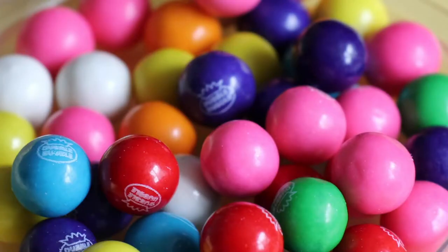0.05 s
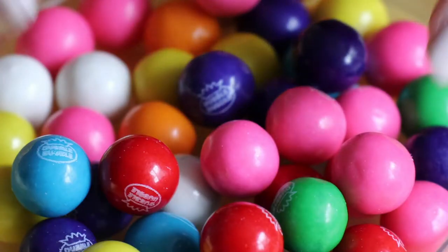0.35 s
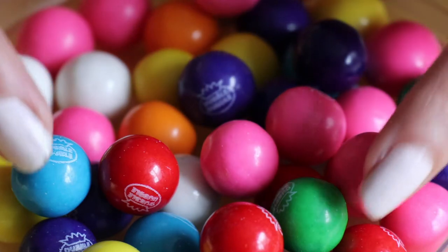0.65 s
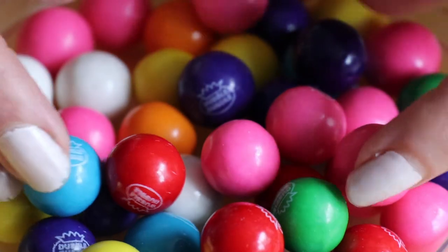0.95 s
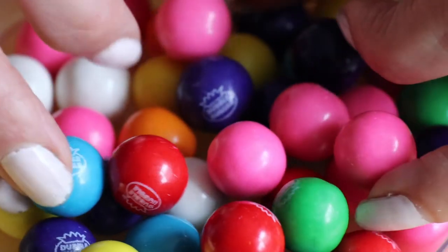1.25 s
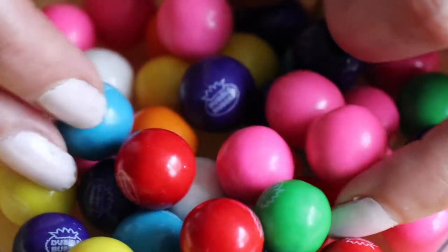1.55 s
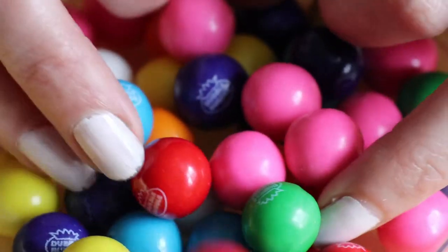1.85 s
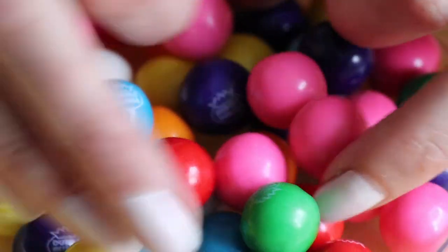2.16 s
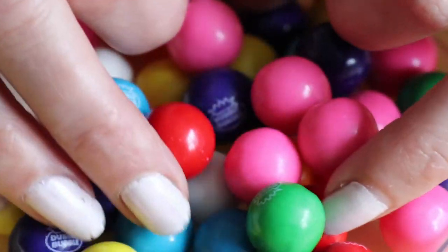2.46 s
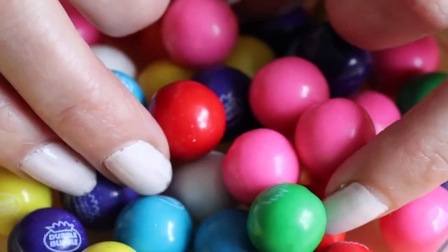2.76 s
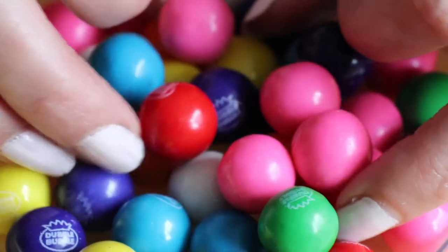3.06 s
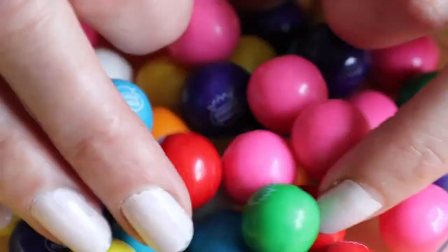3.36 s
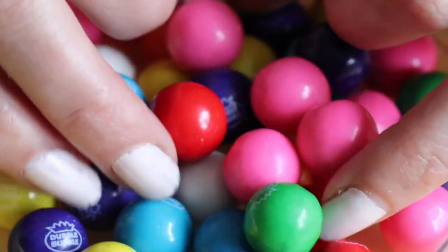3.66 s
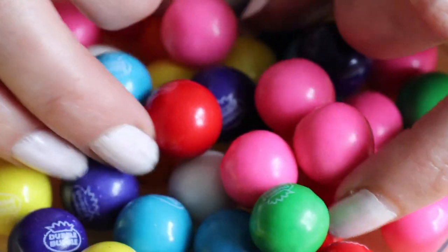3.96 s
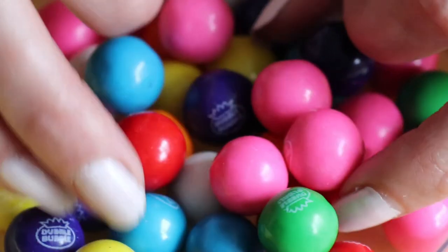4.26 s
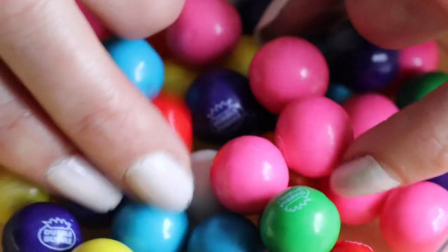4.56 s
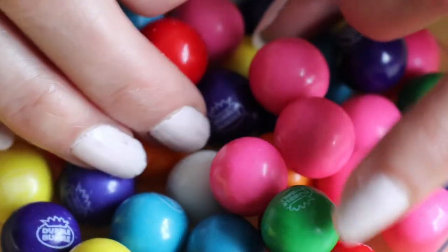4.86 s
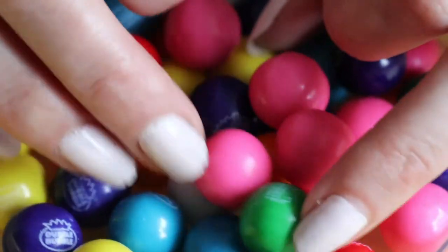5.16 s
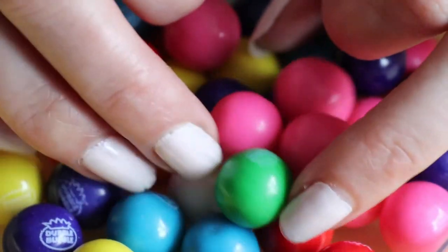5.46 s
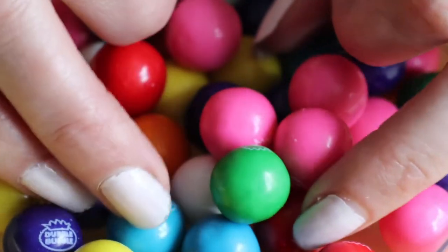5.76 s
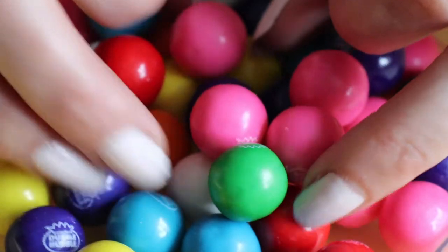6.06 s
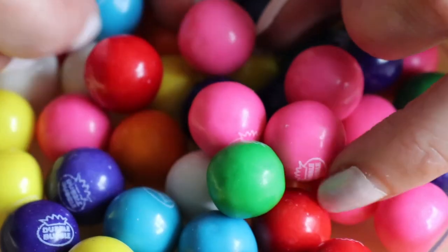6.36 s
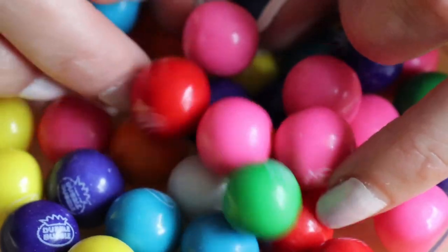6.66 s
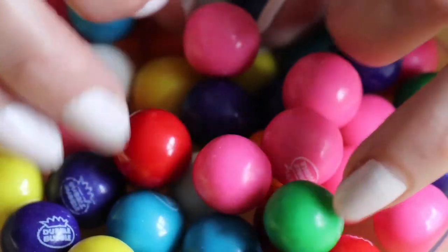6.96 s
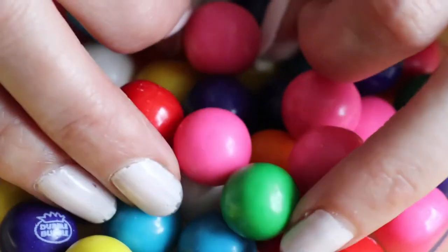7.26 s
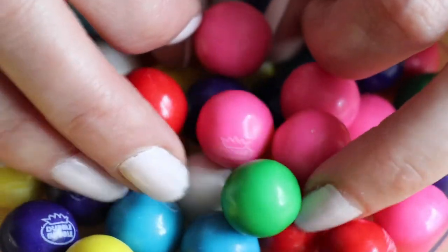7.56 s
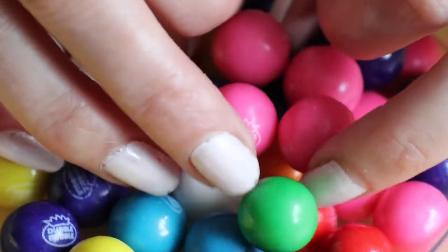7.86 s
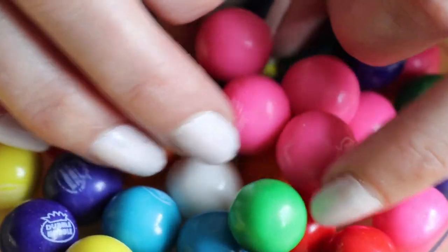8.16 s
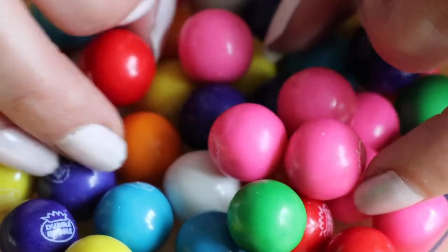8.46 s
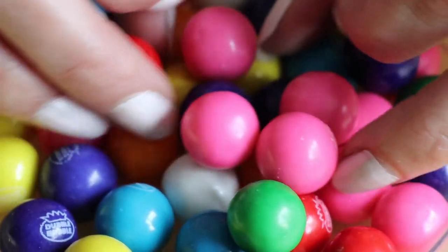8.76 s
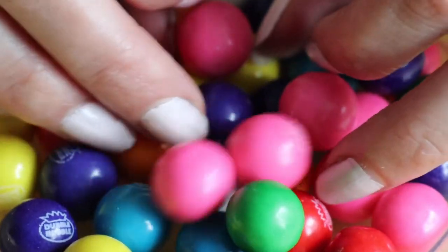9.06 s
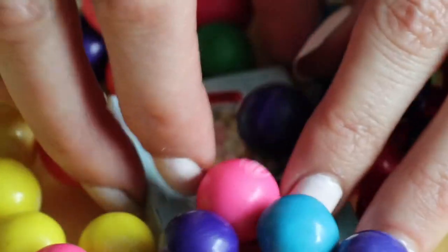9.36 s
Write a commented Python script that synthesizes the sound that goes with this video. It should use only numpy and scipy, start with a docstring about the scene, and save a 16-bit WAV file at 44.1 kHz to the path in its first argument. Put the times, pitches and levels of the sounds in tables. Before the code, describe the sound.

Hard gumballs click and clack together as fingers stir through a pile, rolling and rubbing over a faint low hum.

```python
"""First comes a low rumble over a motor's hum; a hiss joins it, and both rumble and hiss fade away.
From about one second, fingers stir hard candy balls on a wooden table, close by in a small room.
Each clack is a contact that chatters on through the neighbouring balls; in between they roll and rub.
Some settle on the table with a soft thud, and one bounces with hollow knocks.
The hardest clacks overload the recorder."""
import sys
import numpy as np
from scipy import signal
from scipy.fft import rfft, irfft, next_fast_len
from scipy.io import wavfile
from scipy.ndimage import uniform_filter1d

SR = 44100
rng = np.random.default_rng(int(sys.argv[2]) if len(sys.argv) > 2 else 0)


def wav_out(sig):
    """Save sig, one row per channel (or a flat mono array), as 16-bit PCM at SR to the path in sys.argv[1]."""
    wavfile.write(sys.argv[1], SR, np.round(np.clip(np.atleast_2d(sig).T, -1, 1) * 32767).astype(np.int16))


N = 415422

# Levels in the tables are relative. A "colour" says how strong the low and high frequencies are.
# colours of the room's air, the rumble and the hiss: (frequency [Hz], level [dB])
AIR_COLOUR = [(18, -42.5), (30, -15.5), (131, -6.5), (345, -13), (461, -18), (616, -20.5), (1630, -25),
              (2410, -31), (4650, -34.5), (14800, -35.5), (16000, -49)]
RUMBLE_COLOUR = [(25, -26), (60, -7.5), (110, 2.5), (200, -3.5), (300, -14.5), (550, -24.5), (1000, -32),
                 (3000, -54)]
HISS_COLOUR = [(300, -7), (1500, -7), (2700, 1.5), (5000, -6.5), (7400, -4.5), (8200, -0.5), (11800, 2.5),
               (12600, -2), (16000, -8)]
# how the rumble and the hiss come and go: (time [s], level [dB])
RUMBLE_FADE = [(0, -37.5), (.5, -39), (.85, -39), (1.1, -43.5), (1.33, -50), (1.42, -63), (2, -82.5)]
HISS_FADE = [(0, -59), (.85, -60.5), (.89, -40.5), (1.3, -44.5), (1.42, -57.5), (1.7, -58), (2.1, -74.5)]
# tones of the hum: (frequency [Hz], level with the motor running [dB], level while it rests [dB])
HUM_TONES = [(57.6, -56.5, -66.5), (89.5, -50, -69.5), (100, -60.5, -64), (125.3, -67.5, -62)]
# how long the room echoes: (frequency [Hz], time to fade by 60 dB [s])
ECHO_FADE = [(300, 0.39), (1000, 0.0977), (2400, 0.3), (5500, 0.2446), (9000, 0.2363), (15000, 0.15)]
# colour of the echo: (frequency [Hz], level [dB])
ECHO_COLOUR = [(200, -9.5), (700, 8), (1300, 7.5), (1900, 3), (2600, -3), (5000, -3), (8800, -1.5),
               (10500, -8.5), (15000, -8)]
# tones the table top rings with: (frequency [Hz], width [Hz], level [dB])
TABLE_TONES = [(328.5, 47, -4), (404.4, 33, 4.5), (420, 26, -3), (567, 37, -2.5), (710, 20, 10),
               (880, 260, -20.5)]
# a ball bounces on the table: (time [s], level [dB], tilt towards high tones [dB per octave])
TABLE_BOUNCES = [(2.157, -21.5, 6), (2.216, -27, -4), (2.224, -32.5, -2), (2.268, -26.5, 13),
                 (2.285, -31, -17), (2.323, -28, -16), (2.330, -31, 6), (2.358, -24.5, -29),
                 (2.423, -22, -15), (2.453, -21.5, -52), (2.466, -34, -37)]
# a ball slips off its neighbours and settles on the table: (time [s], level [dB])
TABLE_THUDS = [(1.024, -41.5), (1.729, -36.5), (1.773, -35.5), (2.741, -49), (3.432, -39), (3.855, -29.5),
               (3.892, -27.5), (3.932, -42), (4.29, -37), (4.341, -36.5), (4.584, -33), (4.816, -40.5),
               (5.677, -35.5), (6.158, -43), (6.299, -42), (6.981, -52), (7.132, -47), (7.402, -37.5),
               (7.55, -39.5), (7.809, -38.5), (7.857, -34), (7.994, -35), (8.384, -38), (8.967, -48.5),
               (9.177, -35), (9.226, -37.5)]
# a finger pushes through the pile: (start [s], length [s], rubbing [dB], rolling [dB])
FINGER_STROKES = [(0.986, 0.048, -39, -65), (1.14, .66, -48.5, -59), (1.961, 0.11, -47.5, -68),
                  (2.21, 0.59, -48.5, -64), (2.872, 0.33, -54, -64), (3.2, 0.29, -46, -61.5),
                  (3.74, 0.26, -45, -54.5), (4.077, 0.15, -49, -52), (4.24, 0.17, -38, -49),
                  (4.614, 0.23, -52, -60.5), (5.052, .09, -61, -60.5), (5.236, 0.1, -50.5, -58),
                  (5.332, 0.27, -39, -65.5), (6.24, 0.4, -48, -57.5), (6.705, 0.051, -62, -67.5),
                  (6.933, 0.052, -34, -42), (7.076, 0.51, -46.5, -61.5), (7.514, 0.14, -41.5, -53),
                  (7.789, 0.13, -33.5, -49), (8.057, 0.29, -50.5, -64.5), (8.684, 0.15, -59.5, -61.5)]
# colour of shells rubbing together: (frequency [Hz], level [dB])
RUB_COLOUR = [(300, -25.5), (800, -12), (1300, -4.5), (1800, -10), (2400, -1), (3500, -7), (5000, -17.5),
              (8000, -18), (11000, -27.5), (16000, -31)]
# tones the touching balls ring with: (frequency [Hz], width [Hz], level [dB])
PILE_TONES = [(1166, 87, 0.5), (1410, 87, 8.5), (2370, 230, 17), (3252, 130, -2), (5060, 620, -13.5),
              (7200, 2100, 4.5)]
# colour of a bare contact, without ringing: (frequency [Hz], level [dB])
CONTACT_COLOUR = [(60, -42), (300, -32.5), (560, -19.5), (720, -9.5), (950, -4), (4000, 10.5), (9000, 3.5),
                  (12000, -7.5), (16000, -20.5)]
# a clack's four bands, named ring, knock, crack and edge: (lower limit [Hz], upper limit [Hz])
CLACK_BANDS = [(1700, 4000), (700, 1700), (4000, 8000), (8000, 15500)]
# how wide a clack sounds in stereo: (frequency [Hz], side against mid [dB])
CLACK_WIDTH = [(500, -29.5), (2500, -23.5), (6000, -9.5), (11000, -5.5)]
# ball hits ball: (time [s], ring [dB], knock against ring [dB], crack against ring [dB], pitch [Hz])
BALL_HITS = [(1.024, -31.5, -11.5, -3.5, 2600), (1.196, -14, -11.5, -15.5, 2480),
             (1.21, -23, -20, -7.5, 2450), (1.339, -10, -8.5, -7, 2430), (1.371, -22, -0.5, -11.5, 2600),
             (1.443, -22, -14, -3.5, 2450), (1.452, -27.5, -8, -6, 2470), (1.54, -15.5, -17.5, -16, 2400),
             (1.649, -41.5, -26, -6, 2900), (1.693, -34, -38, -30, 2570), (1.7298, -15, -3.5, -10, 2500),
             (1.749, -19.5, -9, -7.5, 2450), (1.773, -21, -4, -5, 2300), (1.783, -14.5, -3, 0, 2430),
             (1.863, -22, -5, -10, 2520), (2.006, -28, -21, -21.5, 2380), (2.025, -35, -19, -18, 2400),
             (2.126, -34, -21, -26, 2340), (2.1557, -12, -6.5, -1, 2420), (2.256, -26.5, -12, -12, 2300),
             (2.3253, -31, -12, -11, 2300), (2.395, -31.5, -10, -16, 2520), (2.436, -30, -7, -3.5, 1990),
             (2.576, -33, -17, -12, 2320), (2.6177, -21.5, -8.5, -15.5, 2410),
             (2.711, -30, -32, -13.5, 2310), (2.74, -33.5, -27, -7.5, 2420), (2.879, -28, -19, -1.5, 2200),
             (2.8858, -31.5, -16, -17, 2420), (2.917, -26.5, -25, -13, 2400),
             (3.005, -31, -15.5, -11.5, 2700), (3.203, -25, -20, -23.5, 2480),
             (3.276, -13.5, -8.5, -2.5, 2510), (3.322, -20.5, -12, -8, 3100), (3.38, -39, -18, -7, 2150),
             (3.4378, -13, -9.5, -2, 6230), (3.675, -36, -6.5, -8.5, 3420), (3.753, -38, -8, -5.5, 2470),
             (3.798, -20, -12, -2.5, 3470), (3.859, -12.5, 0, -1.5, 2710), (3.89, -19, 2, 0.5, 5450),
             (3.9321, -25, -0.5, -2, 2630), (4.197, -44.5, -12, 19, 6640), (4.2932, -19, -9.5, -10, 2420),
             (4.341, -35, 1.5, 12, 3100), (4.368, -29, 0, -6, 3930), (4.3745, -25.5, -3, -4.5, 2430),
             (4.4522, -31, -5, -5, 4020), (4.586, -14, -0.5, 2, 2580), (4.7264, -35.5, -12.5, -5.5, 2130),
             (4.815, -36.5, -2, -4.5, 4180), (5.311, -47, -10, -8.5, 3140), (5.376, -23, -11, 0, 2460),
             (5.445, -28, -5.5, -13, 2400), (5.472, -13, -5, -6, 3020), (5.541, -24.5, -4, -6.5, 3100),
             (5.558, -22, -4.5, -5, 3200), (5.6767, -12, -1.5, -2.5, 2920), (5.697, -19.5, -10, -5.5, 2330),
             (5.732, -25.5, -5, -1, 3410), (5.736, -24, 0, 1, 6600), (5.7436, -26.5, -5, -8, 2340),
             (5.9912, -40, -9, -11.5, 2550), (6.159, -27, 1.5, -5.5, 2700), (6.298, -24.5, -5, -1, 3380),
             (6.411, -25, -3.5, -7, 2480), (6.4505, -20, -6, -9, 2700), (6.485, -27.5, -2, -6.5, 2450),
             (6.514, -20.5, -2, -1.5, 2520), (6.8928, -32.5, -20, -2, 3510), (6.956, -33, -14, -3.5, 2470),
             (6.999, -30.5, -18, -25, 2380), (7.134, -24, -10, -5, 3040), (7.264, -19.5, -19.5, -2.5, 2760),
             (7.382, -23, -6.5, -4.5, 2450), (7.404, -12.5, -8, -10.5, 2970),
             (7.551, -20, -5.5, -7.5, 3250), (7.6187, -29.5, -1.5, 1, 1900),
             (7.811, -16.5, -14, -8.5, 3420), (7.86, -21.5, -6, -6.5, 2460), (7.872, -29.5, -16, 3.5, 3350),
             (7.937, -15.5, -1, -4.5, 2900), (7.947, -13, -9, -5.5, 3000), (7.952, -16, -7.5, -7, 2390),
             (7.994, -18.5, -5, 1.5, 2650), (8.152, -20.5, -22.5, -16, 2470), (8.2, -31.5, -16, -15, 2400),
             (8.24, -18, -9, -12, 2440), (8.279, -16.5, -8, -10, 3200), (8.3847, -14.5, -1.5, -3.5, 2850),
             (8.5127, -18.5, -9.5, -6, 3000), (8.572, -29, -10.5, -7.5, 2270),
             (8.778, -44, -12.5, -8.5, 2380), (8.969, -16.5, -2, -1, 2860),
             (9.179, -12.5, -5.5, -4.5, 2300), (9.227, -16, -8.5, -3, 3590)]


def amp(db):
    """Turns decibels into a gain to multiply by."""
    return 10 ** (np.asarray(db) / 20)


def evened(x):
    """Scales a sound to an average strength (rms) of 1."""
    return x / np.sqrt(np.mean(x ** 2) + 1e-20)


def value_at(points, hz):
    """Looks up a (frequency, value) curve between its points."""
    f, value = np.transpose(points)
    return np.interp(np.log(hz + 1), np.log(f + 1), value)


def fade(points):
    """Gain over time from a (time, level) curve."""
    times, db = np.transpose(points)
    return amp(np.interp(np.arange(N) / SR, times, db))


def add(mix, start_s, sound):
    """Mixes a sound in at the given time."""
    part = mix[..., round(start_s * SR):][..., :sound.shape[-1]]
    part += sound[..., :part.shape[-1]]


def coloured(x, colour):
    """Filters a sound to give it a colour."""
    size = next_fast_len(x.shape[-1])
    gain = amp(value_at(colour, np.fft.rfftfreq(size, 1 / SR)))
    return irfft(rfft(x, size) * gain, size)[..., :x.shape[-1]]


def resonate(x, hz, width):
    """Rings at one frequency; a narrower width rings longer."""
    return signal.lfilter(*signal.iirpeak(hz, hz / width, SR), x)


def ringing_filter(gain):
    """The spectrum of a filter with this gain that starts at once and only rings afterwards."""
    cepstrum = irfft(np.log(np.maximum(gain, 1e-5 * gain.max())))
    half = len(cepstrum) // 2
    return np.exp(rfft(cepstrum * np.r_[1, np.full(half - 1, 2), 1, np.zeros(half - 1)]))


def stereo(mid, side):
    """Left and right from what they share (mid) and what sets them apart (side)."""
    return np.array([mid + side, mid - side])


def noise(colour, side_db):
    """Steady stereo noise of the given colour."""
    mid, side = rng.standard_normal((2, N))
    return evened(coloured(stereo(mid, amp(side_db) * side), colour))


def hum(waver_cycles=.06, rest_from_s=4.78, rest_until_s=9.17):
    """Low, slightly wavering tones; the strongest drop away while a motor rests."""
    t = np.arange(N) / SR
    resting = uniform_filter1d(((t > rest_from_s) & (t < rest_until_s)) * 1., 1500)
    out = np.zeros(N)
    for hz, run_db, rest_db in HUM_TONES:
        drift = np.interp(t, np.linspace(0, t[-1], 60), rng.standard_normal(60))
        gain = amp(run_db + (rest_db - run_db) * resting)
        out += gain * np.sin(2 * np.pi * (hz * t + waver_cycles * drift))
    return np.sqrt(2) * out


def background(air_db=-58):
    """Quiet room air and hum, with a rumble and a hiss that fade as the stirring gets going."""
    air = amp(air_db) * noise(AIR_COLOUR, side_db=-12.5)
    rumble = fade(RUMBLE_FADE) * noise(RUMBLE_COLOUR, side_db=-12)
    hiss = fade(HISS_FADE) * noise(HISS_COLOUR, side_db=-2)
    return air + rumble + hiss + hum()


def echo(side_db=-8, build_s=0.0031):
    """Many small reflections build up quickly, then each frequency dies at its own speed."""
    t = np.arange(SR // 3) / SR
    reflections = rng.choice([-1., 1.], (2, len(t))) * (rng.random((2, len(t))) < .3)
    reflections *= 1 - np.exp(-(t / build_s) ** 2)
    hz, frame_s, spectra = signal.stft(reflections, SR, nperseg=256)
    decay = amp(-60 * frame_s / value_at(ECHO_FADE, hz)[:, None])
    tail = signal.istft(spectra * decay, SR, nperseg=256)[1][:, :len(t)]
    mid, side = coloured(tail / np.linalg.norm(tail[0]), ECHO_COLOUR)
    return stereo(mid, amp(side_db) * side)


def room(x, echo_db=-7.5, count=5):
    """The reflections change as hands and balls move: a few echoes take turns, 50 ms each."""
    turn = np.arange(N) // (SR // 20) % count
    echoes = (signal.oaconvolve((x * (turn == k))[None], echo(), axes=1)[:, :N] for k in range(count))
    return amp(echo_db) * sum(echoes)


def table_blow(tilt_db, shudder, band_hz, bare_db=-2, contact_s=0.0003, shudder_s=0.017):
    """A short push and a dying shudder pass through the table top and make it ring."""
    t = np.arange(SR // 6) / SR
    push = np.exp(-t / contact_s) * (1 - t / contact_s)
    push += shudder * np.exp(-t / shudder_s) * rng.standard_normal(len(t))
    ring = amp(bare_db + tilt_db) * push
    for hz, width, db in TABLE_TONES:
        ring += amp(db + tilt_db * np.log2(hz / TABLE_TONES[1][0])) * resonate(push, hz, width)
    ring = signal.sosfilt(signal.butter(3, band_hz, "band", fs=SR, output="sos"), ring)
    return ring / np.std(ring[:SR // 40])  # strength 1 over the first 25 ms


def table_knocks(thud_db=-6):
    """The table knocks under the bouncing ball; under a settling ball only its low tones murmur."""
    out = np.zeros(N)
    for start, db, tilt_db in TABLE_BOUNCES:
        add(out, start, amp(db) * table_blow(tilt_db, shudder=0.28, band_hz=(350, 867)))
    for start, db in TABLE_THUDS:
        add(out, start, amp(db + thud_db) * table_blow(0, shudder=0.8, band_hz=(384, 508)))
    return out


def finger_strokes(rise_s=.035, fall_s=.03):
    """Gains for rubbing and rolling: each stroke gathers speed and holds, then the balls come to rest."""
    out = np.zeros((2, N))
    for start, length, rub_db, roll_db in FINGER_STROKES:
        t = np.arange(0, length + .3, 1 / SR)
        push = (1 - np.exp(-(t / rise_s) ** 2)) * np.exp(-np.maximum(t - length, 0) / fall_s)
        add(out, start, amp([[rub_db], [roll_db]]) * push)
    return out


def rubbing(gain, trim_db=-3, slips_per_s=700, scatter_db=3, ring_gain=0.82):
    """Tiny slips between the shells come in clumps and ring the pile's strongest tone."""
    sizes = amp(scatter_db * np.minimum(rng.exponential(1, N), 3.5))
    clumps = amp(4 * evened(uniform_filter1d(rng.standard_normal(N), SR // 80)))
    ticks = sizes * (rng.random(N) < slips_per_s / SR)
    slips = clumps * (ticks + .12 * rng.standard_normal(N))
    hz, width, _ = PILE_TONES[2]
    rub = coloured(slips + ring_gain * resonate(slips, hz, width), RUB_COLOUR)
    return amp(trim_db) * gain * evened(rub)


def rolling(gain, trim_db=-3):
    """The table's three lowest tones murmur under the rolling balls."""
    bumps = rng.standard_normal(N)
    murmur = sum(amp(db) * resonate(resonate(bumps, hz, width), hz, width)
                 for hz, width, db in TABLE_TONES[:3])
    return amp(trim_db) * gain * evened(murmur)


def pile_ring(hz, pitch_hz, bare_db=-6, scatter=0.059, widen=1.19):
    """How strongly the pile answers at each frequency; no two groups of balls ring quite alike."""
    detune = np.exp(scatter * rng.standard_normal(len(PILE_TONES)))
    detune[2] = pitch_hz / PILE_TONES[2][0]  # the strongest tone takes this clack's pitch
    response = amp(bare_db)
    for (tone_hz, width, db), shift in zip(PILE_TONES, detune):
        width_hz = widen * width * shift ** 3  # higher rings die sooner
        response = response + amp(db) / (1 + 1j * (hz ** 2 - (tone_hz * shift) ** 2) / (hz * width_hz))
    return abs(response)


def balance_bands(spectrum, gain, hz, bands_db):
    """Filters a burst by the gain, nudged so each clack band nears its level (rms over 5 ms)."""
    centres = np.sqrt(np.prod(CLACK_BANDS, axis=1))
    inside = np.array([(hz > low) & (hz < high) for low, high in CLACK_BANDS])
    for _ in range(2):
        power = inside @ abs(spectrum * gain) ** 2 / ((len(hz) - 1) * .005 * SR)
        missing_db = bands_db - 10 * np.log10(power)
        gain = gain * amp(value_at(sorted(zip(centres, missing_db)), hz))
    return spectrum * ringing_filter(gain)


def clack(ring_db, knock_db, crack_db, pitch_hz, full_force_db=-18, rise_s=0.000099, size=1024):
    """A burst of tiny contacts rings the pile. Gives three rows: mid, side and out into the room."""
    t = np.arange(size) / SR
    hz = np.fft.rfftfreq(size, 1 / SR) + 1
    # a harder crack chatters longer and reaches higher
    force = amp((ring_db + crack_db - full_force_db) / 2)
    chatter_s = 0.00084 + 0.0021 * force
    lift_db = 12 * force * np.log2(np.maximum(hz / CLACK_BANDS[3][0], 1))
    edge_db = crack_db - 11 + 3 * force ** 2
    decay = np.exp(-(t / chatter_s) ** 2) + .12 * np.exp(-t / chatter_s / 2)
    bursts = rng.standard_normal((3, size)) * (1 - np.exp(-t / rise_s)) * decay
    bursts[2] = t == 0  # the room takes the whole burst as one blow
    pile = pile_ring(hz, pitch_hz)
    contact = amp(value_at(CONTACT_COLOUR, hz) + lift_db)
    # the room hears many balls at once, which evens out their tones
    gains = np.array([pile, pile, pile ** 0.48]) * contact
    bands_db = ring_db + np.array([0, knock_db, crack_db, edge_db])
    mid, side, outward = (balance_bands(spectrum, gain, hz, bands_db)
                          for spectrum, gain in zip(rfft(bursts), gains))
    return irfft([mid, side * amp(value_at(CLACK_WIDTH, hz)), outward * amp(-1.5 * force)])


def light_taps(rub_gain, taps_per_s=60, scatter_db=3, light_db=-40, knock_db=-11.5, crack_db=-14):
    """Pushed balls nudge their neighbours at random, as hard as the finger rubs."""
    pitches = np.geomspace(PILE_TONES[2][0], PILE_TONES[3][0], 40)
    offsets_db = scatter_db * rng.standard_normal((len(pitches), 2))
    taps = [clack(light_db, knock_db + dull, crack_db + bright, hz) / amp(light_db)
            for hz, (dull, bright) in zip(pitches, offsets_db)]
    starts = np.flatnonzero(rng.random(N) < taps_per_s / SR)
    strength = rub_gain * amp(scatter_db * rng.standard_normal(N))
    choice = rng.integers(0, len(taps), N)
    out = np.zeros((3, N))
    for at in starts:
        add(out, at / SR, strength[at] * taps[choice[at]])
    return out


def clacks(gain_db=1, graze_db=-30, graze_chance=.75, rebound_db=-17, rebound_chance=.5):
    """Ball strikes ball. Some graze a neighbour just before; some spring back and touch again."""
    out = np.zeros((3, N))
    dice = rng.random((len(BALL_HITS), 5))
    for (start, *settings), (rebound, delay, loss, graze, lead) in zip(BALL_HITS, dice):
        hit = clack(*settings)
        add(out, start, hit)
        if graze < graze_chance:
            add(out, start - .002 - .01 * lead, amp(graze_db) * hit)
        if rebound < rebound_chance:
            add(out, start + .005 + .02 * delay, amp(rebound_db - 9 * loss) * hit)
    return amp(gain_db) * out


def scene(right_db=0.5, table_echo=0.4):
    """The pile and table, slightly to the right, with their room and the background."""
    rub_gain, roll_gain = finger_strokes()
    mid, side, outward = clacks() + light_taps(rub_gain)
    stirring = rubbing(rub_gain) + rolling(roll_gain)
    knocks = table_knocks()
    direct = stereo(mid + stirring + knocks, side)
    echoes = room(outward + stirring + table_echo * knocks)
    return (direct + echoes) * amp([[-right_db], [right_db]]) + background()


def record(dry, top_hz=16100):
    """The recorder flattens the loudest peaks and cuts off the highest treble."""
    flattened = dry / (1 + dry ** 8) ** (1 / 8)
    low_pass = signal.firwin(511, top_hz, window=("kaiser", 9), fs=SR)
    return signal.oaconvolve(flattened, low_pass[None], "same")


dry = scene()
out = record(dry)
wav_out(out)
```